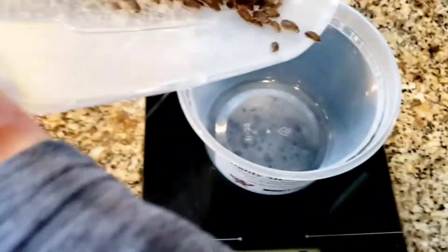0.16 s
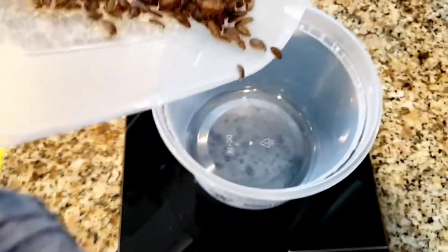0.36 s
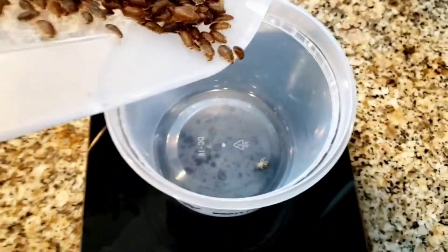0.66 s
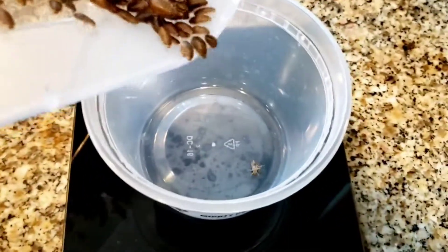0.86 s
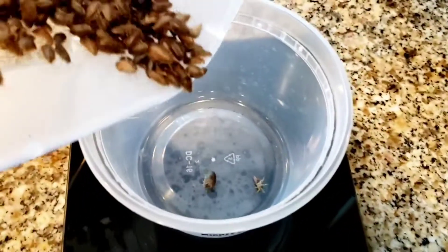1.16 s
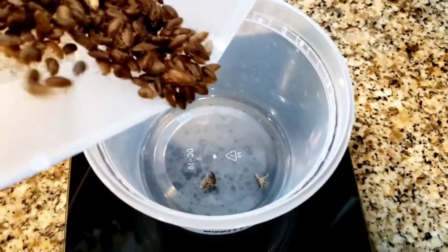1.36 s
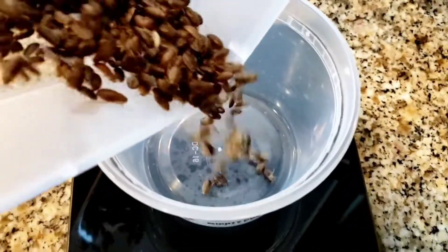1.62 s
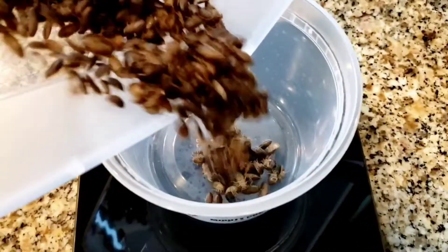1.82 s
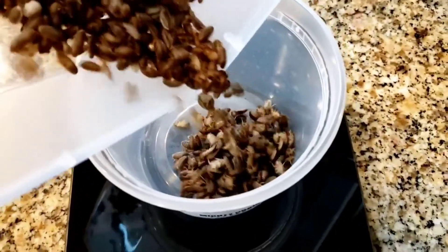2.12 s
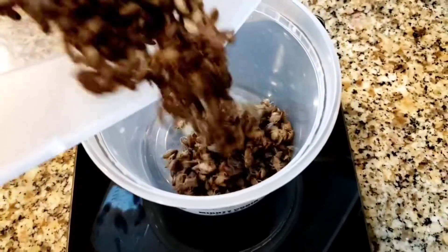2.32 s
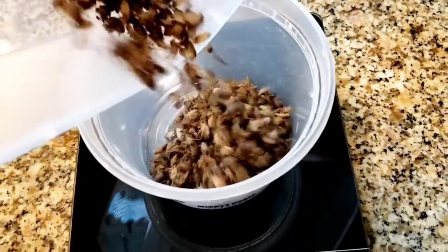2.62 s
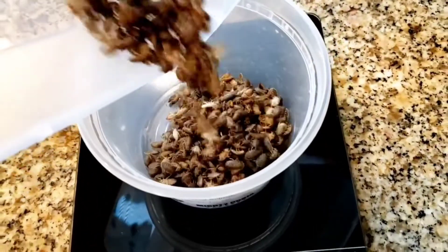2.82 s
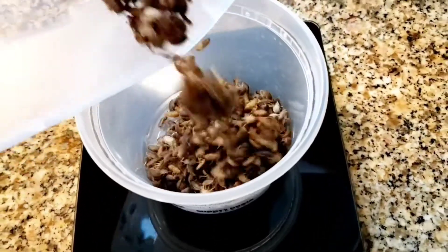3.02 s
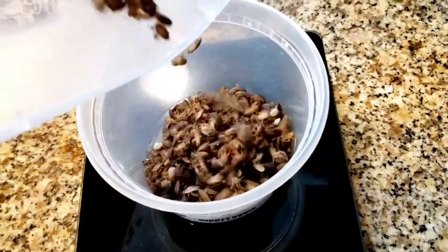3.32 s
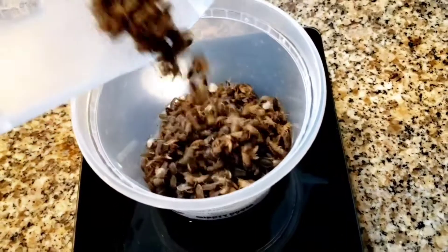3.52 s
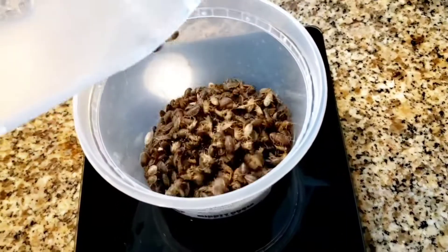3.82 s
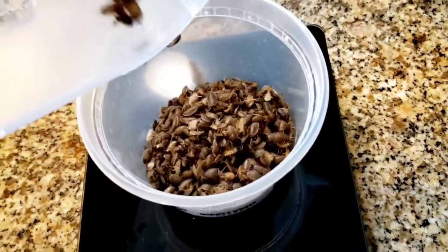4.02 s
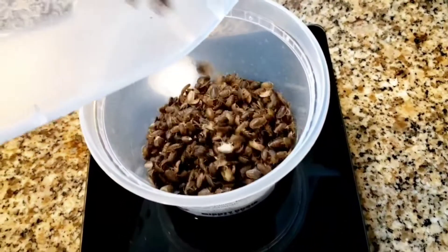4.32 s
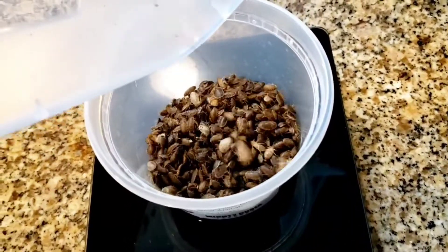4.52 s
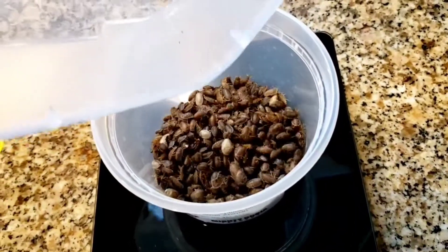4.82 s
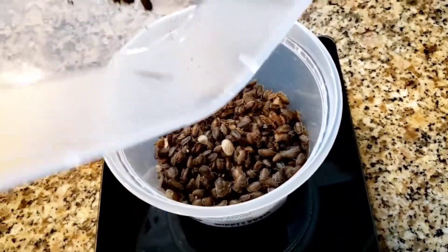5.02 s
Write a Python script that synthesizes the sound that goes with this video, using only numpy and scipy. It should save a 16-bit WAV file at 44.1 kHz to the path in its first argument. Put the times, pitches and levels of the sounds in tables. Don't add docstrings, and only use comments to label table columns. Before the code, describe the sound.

A quiet kitchen with faint hiss, heard very close in stereo. From 0 to 0.5 s come barely audible soft pats, then a light plastic click at 0.54 s, dry grip snaps around 0.73 s and another plink near 1.07 s. At about 1.56 s small hard insect bodies start hitting the bare cup, and from 1.65 to 2.05 s they clatter in a dense, bright, hollow burst. A firm tap lands at 2.08 s, with a brief low hum near 2.3 s. The growing heap dulls the ringing into crisp, papery rustling, with another rush around 2.4 s and sharp little ticks through 3.3 s. Short finger rubs begin near 3.5 s; hollow, booming taps fall at 3.73, 3.9, 4.03 (loudest) and 4.14 s, each jostling the load. The rustle thins to sparse ticks, until the tub rim knocks the cup at 5.06 s, a quick chattering, low-resonant plastic thunk.

```python
import sys
import numpy as np
from scipy import signal
from scipy.fft import rfft, irfft, next_fast_len
from scipy.io import wavfile
from scipy.ndimage import uniform_filter1d

SR = 44100
rng = np.random.default_rng(int(sys.argv[2]) if len(sys.argv) > 2 else 0)


def nominal_scale(level):
    x = np.asarray(level, float) / 20
    return 10 ** x


def dump_mix(stems):
    frames = np.atleast_2d(stems).T
    limited = np.clip(frames, -1, 1)
    pcm = np.round(limited * 32767).astype(np.int16)
    wavfile.write(sys.argv[1], SR, pcm)


N = 227612
SPAN = 4608

# (time [s], peak level [dB], treble share [dB], floor mode [Hz])
LANDINGS = [(0.535, -45.5, -18, 870), (0.542, -34, -10, 938), (1.066, -29.5, -23, 922),
            (1.102, -67, -5, 915), (1.112, -59, -7, 937), (1.563, -31.5, -12, 918), (1.636, -38, -5, 925),
            (1.649, -25.5, -8.5, 1022), (1.669, -31.5, -6, 890), (1.68, -43, -1, 1250),
            (1.683, -31, -3, 1007), (1.702, -34, -26, 924), (1.716, -39.5, -10, 895),
            (1.756, -30, -10, 980), (1.766, -40, -2, 990), (1.773, -33.5, -25, 959), (1.789, -32, -22, 993),
            (1.861, -41.5, 4, 1150), (1.878, -36.5, -12, 1140), (1.889, -39, 0, 1010),
            (1.916, -40.5, -5, 920), (1.939, -42.5, -6, 960), (1.968, -42.5, 1, 960),
            (2.007, -46, -9, 1010), (2.048, -45, 13, 1070), (2.057, -40.5, -3, 920), (2.422, -47, 9, 1020),
            (2.44, -47, -2, 885)]
# (frequency [Hz], level [dB], T60 [s])
CUP_MODES = [(546, -14.5, 0.044), (1150, -12, 0.035), (1900, 3.5, 0.036), (2217, 6, 0.011),
             (2693, 0, 0.021), (3300, -31, 0.016), (4440, 4, 0.019), (5400, 10, 0.0031), (5700, -16, 0.012),
             (7200, -6, 0.0098)]


def insects():
    out = np.zeros((2, N))
    for s, peak_db, treble_db, floor_hz in LANDINGS:
        filling_s = max(s - 1.6, 0)
        lean_db = -6.5 - 0.39 * treble_db - 6 * filling_s
        damped = 1 / (1 + 0.66 * filling_s)
        modes = []
        for hz, db, t60 in [(floor_hz, 0, 0.04)] + CUP_MODES:
            modes.append((hz, db + (treble_db + 3) * (hz > 1500), t60 * damped))
        floor = ring(modes, 0.8, 0.008, 0.0006, 2.4)
        add(out, s, peak_db, lean_db, floor + splinter(treble_db + 8.5, 1.4, 0.027, -11.0))
    return out


# (time [s], peak level [dB], mode [Hz], left-right [dB])
CLACK_EVENTS = [(1.5643, -30, 4440, -19), (1.6492, -32, 2090, -1), (1.6554, -42, 2270, -3),
                (1.6696, -46, 1860, -7.0), (1.6791, -33, 2020, -3), (1.6844, -29, 1930, 3),
                (1.7024, -37, 2010, -1), (1.7164, -40, 1930, -9), (1.7559, -52, 1900, -8.0),
                (1.7664, -47, 1920, -5.5), (1.7888, -32, 1900, -2), (1.7888, -35, 2170, 4),
                (1.8457, -45, 2180, -2.0), (1.859, -42, 2730, -1), (1.879, -39, 2670, -5),
                (1.8844, -40, 1920, -7), (1.893, -40, 2370, -7.0), (1.916, -43, 1880, -4),
                (1.931, -43, 1920, -4.5), (1.9392, -37, 5450, -18), (1.9464, -45, 2270, -7.0),
                (1.9679, -39, 5730, -15), (1.9714, -46, 1990, -5.5), (1.9914, -45, 2030, -9),
                (2.047, -44, 5600, -10.5), (2.0567, -46, 1920, 6), (2.3894, -45, 1940, -3),
                (2.4209, -38.5, 2300, -7.5), (2.4367, -53, 2210, -8.0)]


def clacks():
    out = np.zeros((2, N))
    level_db, t60 = -9, 0.025
    for s, peak_db, hz, lean_db in CLACK_EVENTS:
        modes = [(hz, 0, t60), (hz * 1.02, -5, 0.66 * t60)]
        patch = ring(modes, 0.84, 0.0062, 0.00078)
        add(out, s, peak_db + level_db, lean_db, patch + splinter(-9, 3, 0.007, -8))
    return out


# (time [s], peak level [dB], mode [Hz], top share [dB])
TICK_EVENTS = [(2.4933, -38.5, 5260, -14), (2.52, -51, 5900, -18), (2.5526, -62, 4700, -8),
               (2.5706, -51, 5400, -17), (2.5912, -46.5, 4760, -11), (2.601, -46, 5320, 0),
               (2.65, -37, 5250, -8), (2.6713, -43.5, 5400, -16), (2.6756, -41.5, 5500, -1),
               (2.9936, -42.5, 5700, -2), (3.142, -62, 5600, -12), (3.1487, -30.5, 5700, -5.5),
               (3.1915, -49, 5560, 2), (3.2252, -29.5, 5840, -10), (3.285, -39, 5700, -2),
               (3.3003, -41, 4750, -11), (3.3053, -43, 5560, -23), (3.6904, -42.5, 5960, 5),
               (3.8049, -41.5, 5120, 1), (4.0854, -60, 4500, -7), (4.26, -43, 5430, 5),
               (4.271, -53, 4500, 3), (4.2976, -47.5, 4630, -11), (4.469, -58.5, 5500, -9.5),
               (4.5, -55, 5850, 17), (4.602, -59, 5660, -21), (4.646, -55.5, 5260, 23),
               (4.7, -45.5, 4030, -13), (4.7144, -57, 5600, -30), (4.7535, -47, 3900, -21)]


def ticks():
    out = np.zeros((2, N))
    for s, peak_db, hz, top_db in TICK_EVENTS:
        lean_db = -19.5 + 31 * np.log2(hz / 5400)
        modes = [(hz, 0, 0.007), (hz * 1.067, -4, 0.005), (hz * 0.793, -6, 0.004)]
        edge = splinter(0.38 * top_db - 13.5, top_db + 25, 0.024, 1.3)
        add(out, s, peak_db, lean_db, ring(modes, 1.0, 0.03, 0.00035) + edge)
    return out


# (time [s], crawling level [dB], level of the fall into the cup [dB])
HEAP_MOTION = [(0.0, -81, -88), (0.67, -76.5, -77), (1.05, -81, -77.5), (1.33, -76, -77.5),
               (1.61, -73.5, -67), (1.72, -73.5, -56.5), (1.82, -65, -59.5), (2.05, -62.5, -66.5),
               (2.18, -67.5, -64.5), (2.4, -61.5, -59), (2.6, -63.5, -67), (2.76, -67, -71),
               (3.02, -62.5, -68.5), (3.12, -67, -69.5), (3.74, -66.5, -69.5), (4.34, -71, -83.5),
               (4.5, -74, -80), (5.16, -75, -78)]
# (frequency [Hz], density [dB per Hz])
LEG_SPECTRUM = [(880, -37), (1500, -17.5), (2140, -0.5), (2770, -8.5), (3030, -15), (3620, -6), (4080, -5),
                (5660, -2.5), (6430, -7), (7100, -13.5), (8500, -25), (16000, -58)]
# (frequency [Hz], left-right [dB])
LEG_LEAN = [(1500, -35), (2200, 10.5), (3000, -8), (4400, -25), (5700, -18), (7500, -0.5), (9500, -9.5),
            (12500, -19), (15500, -21.5)]


def legs():
    level = nominal_scale(curve(HEAP_MOTION, 1)) + nominal_scale(-63) * shake()
    return level * coloured(grains(3000, 1.9, 0.0018, 0.6), LEG_SPECTRUM, LEG_LEAN)


# (frequency [Hz], density [dB per Hz])
HAIR_SPECTRUM = [(6000, -31), (7100, -9), (8300, -4.5), (9650, -0.5), (10800, -3.5), (12400, 2.7),
                 (13600, -6.5), (15200, -12.5), (16000, -6)]


def fizz():
    level = nominal_scale(-4.5) * nominal_scale(curve(HEAP_MOTION, 1))
    return level * coloured(grains(5000, 1.5, 0.002, 1.0), HAIR_SPECTRUM, LEG_LEAN)


# (frequency [Hz], density [dB per Hz])
PATTER_SPECTRUM = [(150, -10.5), (330, -6), (450, -8.5), (570, 0), (720, -14.5), (1000, -7.5), (1400, -17),
                   (2100, -22.5), (3200, -22), (7000, -62)]


def patter():
    level = nominal_scale(curve(HEAP_MOTION, 2)) + nominal_scale(-44.5) * shake()
    falls = blended(grains(330, 4.3, 0.022, 2.1), 0.38)
    return level * coloured(falls, PATTER_SPECTRUM, [(300, -4.0), (1200, -1.0)])


# (frequency [Hz], density [dB per Hz])
CLATTER_SPECTRUM = [(600, -25), (950, 3), (1400, -9), (2000, 2), (2700, -6), (3500, -11), (4400, -8),
                    (5500, -3), (7000, -22), (12000, -35)]


def clatter():
    bare_from_s, cover_s = 1.5, 0.32
    u = np.arange(N) / SR - bare_from_s
    bare = np.clip(u / 0.03, 0, 1) * np.exp(-(np.maximum(u, 0) / cover_s) ** 2)
    level = nominal_scale(curve(HEAP_MOTION, 2) - 6) * bare
    clicks = blended(grains(260, 5.1, 0.0025, 1.4), 0.6)
    return level * coloured(clicks, CLATTER_SPECTRUM, [(1000, -3), (5500, -17)])


# (time [s], peak level [dB], boom share [dB], crack share [dB], left-right [dB])
TAP_EVENTS = [(0.743, -30, -45, 13, -17), (0.743, -30.5, -44, -23, -11), (0.752, -35, -33, -21, 1),
              (1.059, -42, -20.5, -25.5, -3), (1.746, -36, -8, -27, 8), (2.08, -15.5, -15.5, -22, 11),
              (3.307, -43.5, 4.5, 0.5, 20), (3.652, -47.5, -13, -29, 14), (3.73, -20.5, -21.5, -20.5, 18.5),
              (3.769, -38, 11, -12, 15), (3.811, -32, -10, -20.5, 7.5), (3.903, -14, -25, -18, 15.5),
              (3.942, -41, -3, -3, 22), (3.96, -45, -13, -17, 11), (4.031, -9.5, -22.5, -15, 19),
              (4.089, -43, -31, 9, -13), (4.137, -17.5, -25, -25, 4.5), (4.178, -39.5, -8, 7, -17),
              (4.226, -68, -13, -27, -10), (4.249, -25.5, -19, -49, 8), (4.646, -48.5, -13, -6, 0),
              (4.751, -47.5, -13.5, -16, -1)]
# (frequency [Hz], level [dB], T60 [s])
LIP_MODES = [(132, -1, 0.085), (200, -1.5, 0.06), (317, 1, 0.064), (405, 8, 0.034), (514, 8, 0.047),
             (820, -17, 0.0042), (1300, 3, 0.014), (1710, 13.5, 0.0053)]
# (frequency [Hz], level [dB], T60 [s])
WALL_MODES = [(80.8, -35, 0.062), (107.5, 2.5, 0.089), (152.4, -2, 0.072), (190, -3, 0.086),
              (271, 8.5, 0.059), (335, 7.5, 0.041), (383, 1, 0.026), (486, 12.5, 0.049), (640, -6.5, 0.049),
              (880, -3, 0.015), (950, -8, .015), (1305, 5.5, 0.02)]
# (frequency [Hz], level [dB], T60 [s])
CORNER_MODES = [(116.6, 2.5, 0.093), (175, 3, 0.047), (300, -0.5, 0.043), (386, 4.7, 0.027),
                (519, 14, 0.033), (595, 1, 0.026), (880, 0, 0.039), (1330, -18.5, 0.043)]
# (frequency [Hz], left-right [dB])
WALL_LEAN = [(100, 3), (270, 7.5), (500, -2.8), (700, 3.5), (1000, -5), (1300, 4.5)]


def taps():
    out = np.zeros((2, N))
    for s, peak_db, boom_db, crack_db, lean_db in TAP_EVENTS:
        contact_ms = 0.18 if s < 3.92 else 0.077
        struck = LIP_MODES if s < 3 else WALL_MODES if s < 4.12 else CORNER_MODES
        held = 0.45 if s < 1 else 1
        modes = [(hz, db + (boom_db + 23.0) * (hz < 200), t60 * held) for hz, db, t60 in struck]
        body = ring(modes, 0.3, 0.014, 0.00074, 2.3, WALL_LEAN)
        body[1] = np.roll(body[1], 30) * (np.arange(SPAN) >= 30)
        crack = spike(crack_db + 38.0, contact_ms) + splinter(crack_db + 22.0, -25.5, 0.0079, 2.0)
        side = 1 if s > 3 else -1
        add(out, s + 0.002, peak_db, lean_db, side * (body + crack))
    return out


# (time [s], peak level [dB], mode [Hz], left-right [dB])
PAT_EVENTS = [
    (0.064, -56, 2200, 17),
    (0.089, -59, 2080, 21),
    (0.119, -55.5, 2120, 23),
    (0.152, -52.5, 2060, 30),
    (0.281, -52.5, 338, -28),
    (0.366, -49, 537, -32),
    (0.43, -44.5, 546, -35),
]


def pats():
    out = np.zeros((2, N))
    feet = [(1.312 + 0.0283 * step, -64, 1500, -24) for step in range(7)]
    for s, peak_db, hz, lean_db in PAT_EVENTS + feet:
        add(out, s, peak_db, lean_db, ring([(hz, 0, 0.012), (300, -12, 0.02)], 1.0, 0.01, 0.00018))
    return out


# (time [s], peak level [dB])
SNAP_EVENTS = [
    (0.713, -47),
    (0.718, -60),
    (.722, -67),
    (0.7286, -38),
    (0.733, -37),
    (0.7342, -30),
    (0.752, -42),
]


def snaps():
    out = np.zeros((2, N))
    for s, peak_db in SNAP_EVENTS:
        add(out, s, peak_db, -17, splinter(0, 18.5, 0.0012, -9))
    return out


# (time [s], peak level [dB], crack share [dB])
KNOCK_EVENTS = [
    (5.0579, -12.5, -1),
    (5.0608, -13, -5),
    (5.068, -18, -16),
    (5.076, -21.5, -39),
    (5.084, -31, -31),
]
# (frequency [Hz], level [dB], T60 [s])
RIM_MODES = [(116, -3.5, 0.2), (142, 6, 0.25), (171, -4, 0.29), (257.3, 0.5, 0.088), (329, -8, 0.092),
             (435, 1.5, 0.099), (500, -19, 0.091), (561, 4.6, 0.054), (645, -1.5, 0.033), (760, -16, 0.041),
             (925, -8.5, 0.07), (1255, -14.5, 0.061), (1910, -14, 0.025), (2310, -15, 0.017)]
# (time [s], peak level [dB])
EDGE_RATTLES = [
    (5.059, -35),
    (5.063, -39),
    (5.069, -46),
    (5.072, -56),
    (5.111, -63),
    (5.117, -57),
    (4.863, -72),
    (5.042, -70),
]


def knock():
    out = np.zeros((2, N))
    for k, (s, peak_db, crack_db) in enumerate(KNOCK_EVENTS):
        bass_db = 0 if k == 2 else -7.5
        modes = [(hz, db + bass_db * (hz < 200), t60) for hz, db, t60 in RIM_MODES]
        crack = splinter(crack_db, -6.5, 0.024, -27)
        add(out, s, peak_db, -4, ring(modes, 0.77, 0.0082, 0.00042, 1.8) + crack)
    for s, peak_db in EDGE_RATTLES:
        add(out, s, peak_db, -16, splinter(0, 34, 0.006, -10))
    return out


def shake():
    rise_s, t60 = 0.0099, 0.41
    blows, u = np.zeros(N), np.arange(SR) / SR
    for s, peak_db, *_ in TAP_EVENTS + KNOCK_EVENTS:
        blows[round(s * SR)] += nominal_scale(peak_db)
    swell = nominal_scale(-60 * u / t60) * (1 - np.exp(-u / rise_s))
    return abs(signal.fftconvolve(blows, swell)[:N])


# (middle time [s], length [s], level [dB])
STROKE_EVENTS = [
    (3.121, 0.22, -63),
    (3.48, 0.033, -70),
    (3.493, 0.12, -46.5),
    (3.608, 0.14, -59),
    (3.75, 0.052, -56.5),
    (3.811, 0.048, -53.5),
    (3.94, 0.16, -62.5),
    (4.078, 0.042, -49.5),
    (4.174, 0.063, -56.5),
    (4.298, 0.03, -67.5),
]


def strokes():
    t, out = np.arange(N) / SR, np.zeros(N)
    for s, length_s, db in STROKE_EVENTS:
        phase = np.pi * np.clip((t - s) / length_s, -0.5, 0.5)
        out += nominal_scale(db) * abs(np.cos(phase)) ** 1.62
    return out


# (frequency [Hz], density [dB per Hz])
RUB_SPECTRUM = [(47, -43), (80, -9.5), (502, -6.5), (1580, -7), (3020, -13.5), (10100, -27.5),
                (14000, -53.5)]


def rub():
    slips = blended(grains(5600, 4.2, 0.0042, 3.6), 0.37)
    return strokes() * coloured(slips, RUB_SPECTRUM, [(200, 6.5), (2000, 24), (9000, 16)])


# (frequency [Hz], density [dB per Hz])
GRIP_SPECTRUM = [(30, -35), (70, -10.5), (140, -1.5), (250, -1), (400, -2.5), (800, -19.5), (2000, -82)]


def grip():
    steady = nominal_scale(-78 + 0.24 * (curve(HEAP_MOTION, 2) + 72.0))
    level = steady + nominal_scale(-37) * shake() + nominal_scale(-13.5) * strokes()
    slips = blended(grains(340, 5.5, 0.0085, 3.0), 1.0)
    return level * coloured(slips, GRIP_SPECTRUM, [(100, -2.5), (400, -5.0)])


# (middle time [s], length [s], level [dB], frequency [Hz])
SHUDDER_EVENTS = [
    (2.305, 0.068, -45.5, 140),
    (4.745, 0.083, -60, 280),
]


def shudder():
    t, out = np.arange(N) / SR, np.zeros((2, N))
    for s, length_s, db, hz in SHUDDER_EVENTS:
        swell = nominal_scale(db) * abs(np.cos(np.pi * np.clip((t - s) / length_s, -0.5, 0.5)))
        out += swell * np.sin(2 * np.pi * hz * t - np.array([[1.4], [0]]))
    return out


# (frequency [Hz], T60 [s])
ROOM_T60 = [(100, 0.29), (1000, 0.35), (5000, 0.28), (15000, 0.28)]


def room(x):
    out, t_all = np.zeros((2, N)), np.arange(N) / SR
    crossed = x + 0.65 * x[::-1]
    for k in range(3):
        paths = np.zeros((2, SR // 2))
        slots = np.arange(200, SR // 2 - 20, 20)
        at = slots + rng.integers(0, 20, (2, (SR // 2 - 201) // 20))
        np.put_along_axis(paths, at, rng.choice([-1., 1.], at.shape), 1)
        hz, t, z = signal.stft(paths, SR, nperseg=256)
        decay = nominal_scale(-60 * t / read(ROOM_T60, hz)[:, None])
        tail = signal.istft(z * decay, SR, nperseg=256)[1]
        share = np.sqrt(2 / 3) * np.cos(2 * np.pi * (8 * t_all + k / 3))
        out += signal.fftconvolve(crossed * share, tail / np.linalg.norm(tail[0]), axes=1)[:, :N]
    return out


# (frequency [Hz], density [dB per Hz])
HUSH_SPECTRUM = [(18, -59), (30, -43.5), (115, -23.5), (131, -3.5), (174, -5.5), (252, -3.5), (364, -18),
                 (616, -26), (1860, -16.5), (2230, -1), (2750, -30), (6900, -30), (9220, -50),
                 (16000, -62.5)]
# (frequency [Hz], left-right [dB])
HUSH_BALANCE = [(60, 2.5), (120, -8.5), (240, -9), (480, -2.5), (950, -0.5), (1890, 20.5), (3770, -2),
                (7520, 10), (15000, -4)]
# (frequency [Hz], correlation [-1 to 1])
HUSH_LIKENESS = [(60, 1), (180, 0.67), (550, 1), (1650, -1.1), (4970, -0.29), (15000, -0.0)]


def hush():
    size = next_fast_len(N)
    a, b = rfft(grains(14000, 2.5, 0.011, 0.239), size)
    same = np.clip(read(HUSH_LIKENESS, np.fft.rfftfreq(size, 1 / SR)), -1, 1)
    pair = irfft(np.array([a, same * a + np.sqrt(1 - same ** 2) * b]), size)[:, :N]
    return nominal_scale(-73.5) * coloured(pair, HUSH_SPECTRUM, HUSH_BALANCE)


# (frequency [Hz], density [dB per Hz])
IMPACT_SPECTRUM = [(300, -16), (900, -21.5), (2200, 7), (3500, -0.5), (5500, 2.5), (7200, -15),
                   (10000, -13), (12500, -19.5), (15500, -32)]


def splinter(db, tilt_db, t60, dull_db):
    t, hz = np.arange(SPAN) / SR, np.fft.rfftfreq(SPAN, 1 / SR)
    high = np.clip(np.log2(hz / 3000 + 1e-9) / 2, 0, 1)
    port_db = np.array([dull_db * high, 0 * high])
    colour = nominal_scale(read(IMPACT_SPECTRUM, hz) + tilt_db * high + port_db)
    noise = irfft(rfft(rng.standard_normal((2, SPAN))) * colour, SPAN)
    return nominal_scale(db - 60 * t / t60) * (1 - np.exp(-t / 0.00035)) * evened(noise)


def spike(db, width_ms):
    u = np.arange(SPAN) / SR / (width_ms / 1000) - 2.5
    return -nominal_scale(db) * np.exp(-u ** 2) * np.array([[1], [0.2]])


def ring(modes, spread, detune, rise_s, scatter_db=2.0, lean=((1, 0), (2, 0))):
    hz, db, t60 = np.transpose(modes)[:, :, None]
    t, luck = np.arange(SPAN) / SR, rng.standard_normal((5, len(modes), 1))
    dying = np.exp((2j * np.pi * hz * (1 + detune * luck[0]) - np.log(1000) / t60) * t)
    tilt = read(lean, hz) / 2
    strength = nominal_scale(db + np.array([tilt, -tilt]) + scatter_db * luck[1:3])
    heard = strength * np.exp(1j * spread * luck[3:])
    return (heard[:, :, 0] @ dying).imag * (1 - np.exp(-t / rise_s))


def grains(per_s, spread_db, grain_s, clump_db):
    size = nominal_scale(spread_db * np.minimum(rng.exponential(1, N), 5)) * (rng.random(N) < per_s / SR)
    clump = evened(uniform_filter1d(uniform_filter1d(rng.standard_normal(N), 700), 700))
    puff = signal.lfilter([1], [1, -np.exp(-1 / (grain_s * SR))], size * nominal_scale(clump_db * clump))
    return puff * rng.standard_normal((2, N))


def blended(x, share):
    return np.array([x[0], share * x[0] + np.sqrt(1 - min(share, 1) ** 2) * x[1]])


def coloured(x, spectrum, lean):
    size = next_fast_len(N)
    hz = np.fft.rfftfreq(size, 1 / SR)
    tilt = read(lean, hz) / 2
    gain = nominal_scale(read(spectrum, hz) + np.array([tilt, -tilt]) - abs(tilt))
    y = irfft(rfft(x, size) * gain, size)[:, :N]
    return y / np.std(y.mean(0))


def add(mix, s, db, lean_db, sound):
    lean = nominal_scale(np.array([[lean_db / 2], [-lean_db / 2]]))
    sound = sound / abs(sound).max(1, keepdims=True) * lean
    part = mix[:, round(s * SR):][:, :sound.shape[1]]
    part += (nominal_scale(db) * 2 * sound / abs(sound).max(1).sum())[:, :part.shape[1]]


def evened(x):
    return x / np.sqrt(np.mean(x ** 2) + 1e-20)


def read(points, hz):
    f, value = np.transpose(points)
    return np.interp(np.log(hz + 1), np.log(f + 1), value)


def curve(rows, column):
    rows = np.array(rows)
    return np.interp(np.arange(N) / SR, rows[:, 0], rows[:, column])


def scene():
    bugs, rim = insects(), knock()
    shells = ticks() + clacks()
    hand = taps() + pats() + snaps()
    echo = room(nominal_scale(-13.0) * bugs + nominal_scale(-18.5) * shells + nominal_scale(-37.0) * hand + nominal_scale(-18) * rim)
    crowd = legs() + fizz() + patter() + clatter()
    handling = rub() + grip() + shudder()
    return bugs + shells + crowd + hand + rim + handling + echo + hush()


def band_limit(x):
    return signal.sosfilt(signal.butter(12, 16430, fs=SR, output="sos"), x)


def record(dry):
    bass_cut = signal.butter(4, 68, "high", fs=SR, output="sos")
    cut = signal.sosfilt(bass_cut, dry)
    treble_edge = signal.firwin(511, 15750, window=("kaiser", 9), fs=SR)
    cut = signal.oaconvolve(cut, treble_edge[None], "same")
    return band_limit(cut)


dry = scene()
out = record(dry)
dump_mix(out)
```